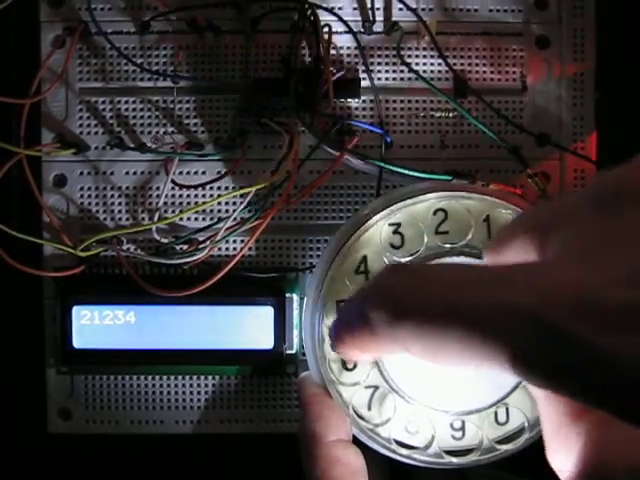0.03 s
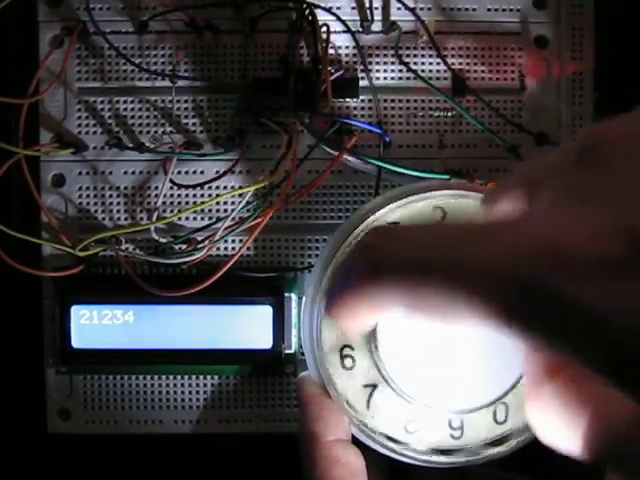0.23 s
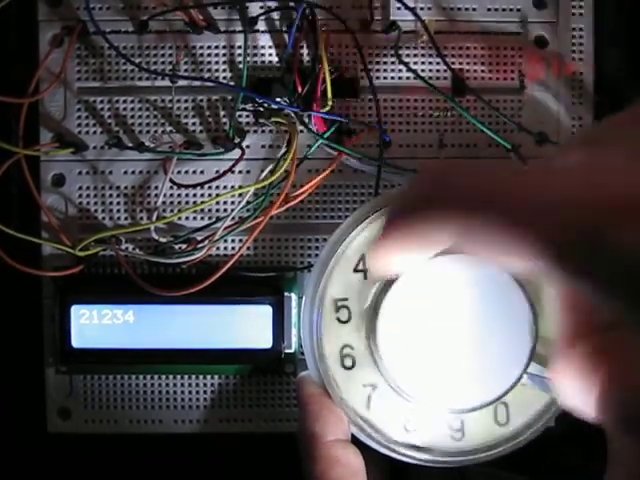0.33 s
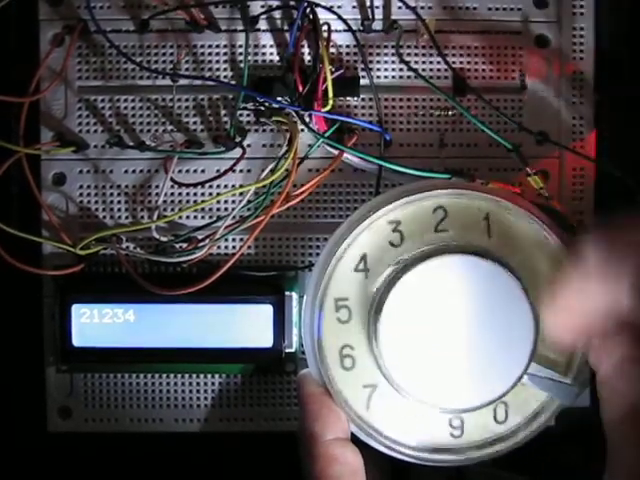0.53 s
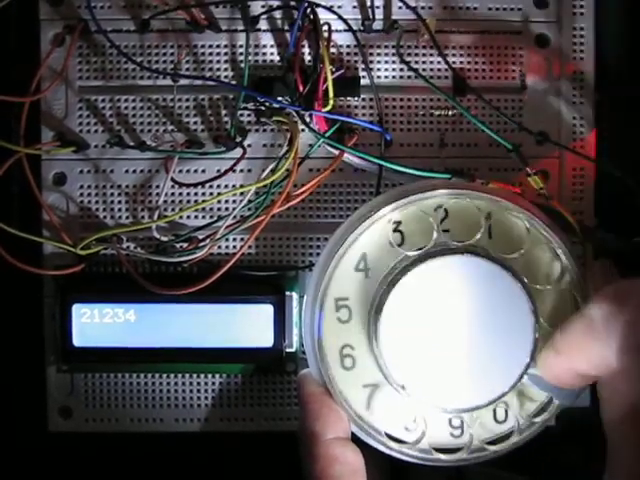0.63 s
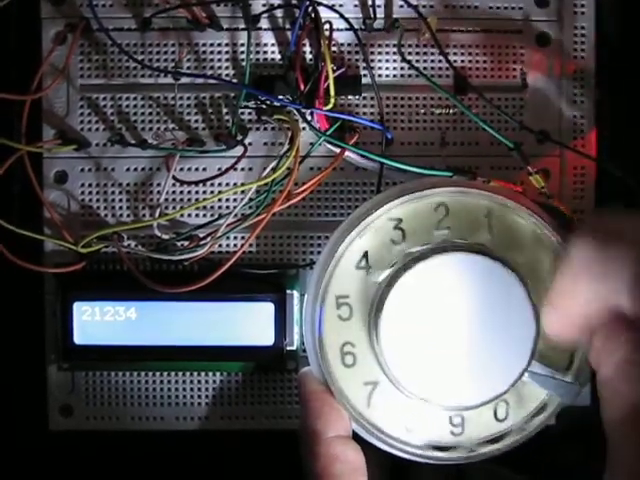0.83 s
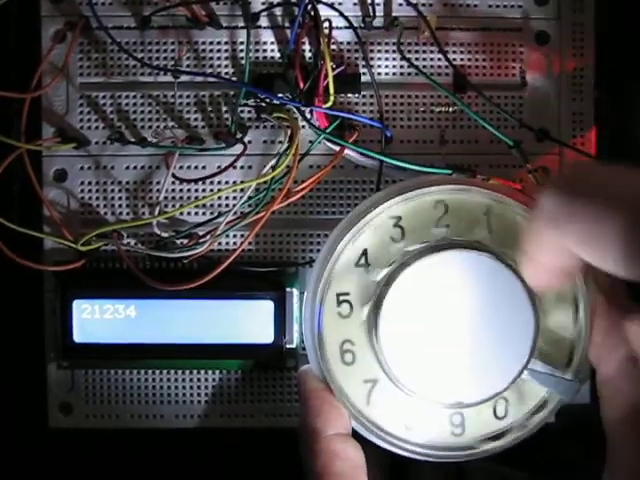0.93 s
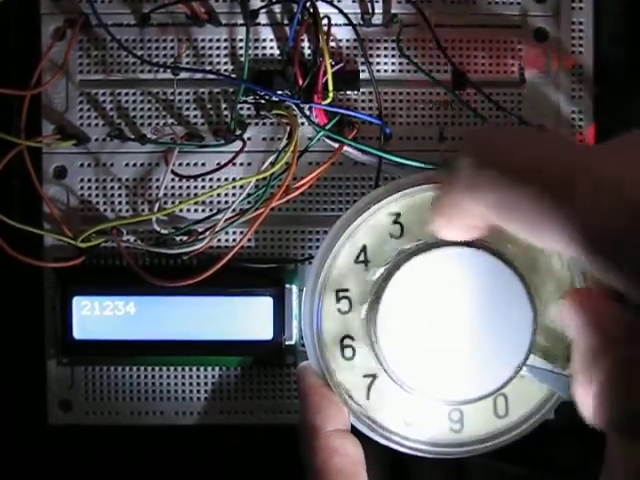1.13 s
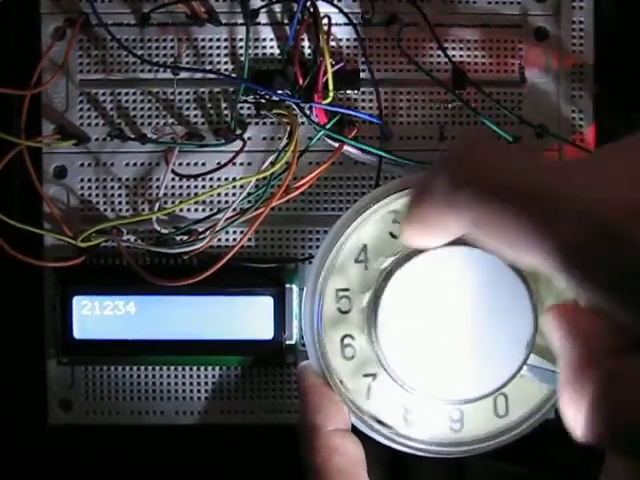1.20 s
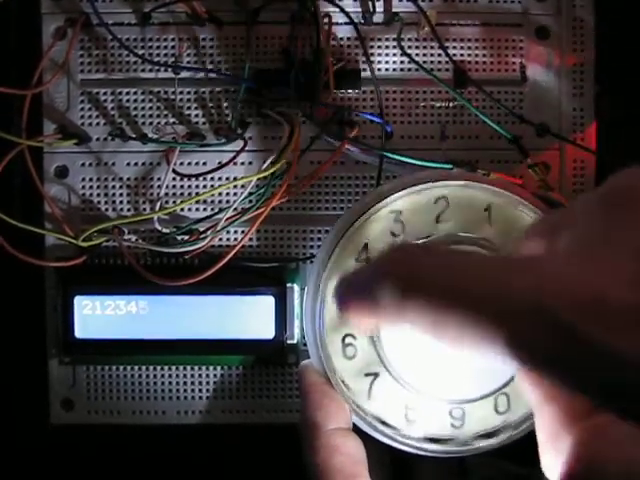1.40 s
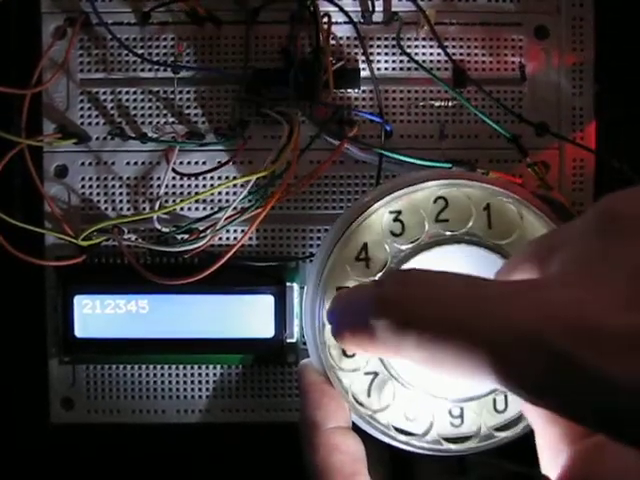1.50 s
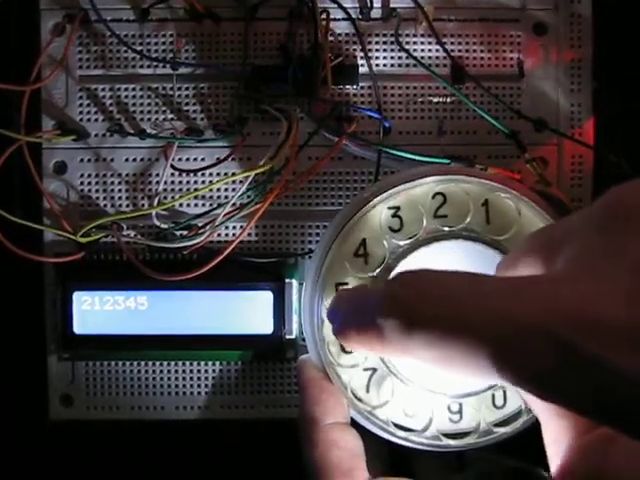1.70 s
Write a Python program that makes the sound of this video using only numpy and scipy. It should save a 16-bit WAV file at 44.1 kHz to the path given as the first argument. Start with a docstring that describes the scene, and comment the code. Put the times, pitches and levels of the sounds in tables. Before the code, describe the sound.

A rotary telephone dial is wound with ratcheting clicks, then whirs back and clatters to rest.

```python
"""A bare rotary telephone dial dials a five, close to the microphone on a desk in a small room.
The finger winds it over a ratchet to the stop and lets go; the governor whirs it home while a cam works
the pulse contacts, and it clatters to rest. The dial sits a little to the right of the microphone.
Under the run home is a faint handling rumble; behind it, room tone, a fan-like hum and a thin whine."""
import sys
import numpy as np
from scipy import signal
from scipy.fft import rfft, irfft
from scipy.io import wavfile
from scipy.ndimage import uniform_filter1d

SR = 44100
rng = np.random.default_rng(int(sys.argv[2]) if len(sys.argv) > 2 else 0)


def wav_record(signal):
    """Record a signal, one row per channel, as 16-bit PCM in the file named by sys.argv[1]."""
    frames = np.transpose(np.atleast_2d(signal))
    bounded = np.clip(frames, -1, 1)
    # unit amplitude maps onto the largest positive 16-bit level
    quanta = np.round(bounded * 32767).astype(np.int16)
    wavfile.write(sys.argv[1], SR, quanta)


N = 77175
T = np.arange(N) / SR


def dial():
    """The whole mechanism, heard close up: wound to the stop, released, and running home."""
    pawl = ratchet()
    blows = strikes() + knocks()
    ringing = metal(undb(3) * pawl + blows)
    return pawl + blows + ringing + rubbing() + governor() + contacts() + scrape_and_knock() + clatter()


# Ratchet clicks on the wind-up (time [s], then relative level [dB] in each of the five click bands)
RATCHET_CLICKS = [(0.0385, -51.5, -45, -54, -58, -64), (0.2087, -58, -33, -34.5, -31, -63),
                  (0.2364, -35, -25, -31.5, -40.5, -55), (0.2700, -62, -43, -45, -46, -74),
                  (0.2858, -70, -36, -68, -53, -68), (0.2965, -39, -29, -31.5, -36, -56),
                  (0.3001, -35.5, -28.5, -40, -43, -63), (0.3445, -51, -57, -35, -37, -49),
                  (0.3475, -49, -33, -32.5, -32.5, -57), (0.3517, -35, -26.5, -43, -38, -47),
                  (0.354, -45, -30.5, -33, -43, -41.5), (0.3672, -58, -39, -39, -71, -55),
                  (0.398, -42, -30.5, -30.5, -34.5, -87), (0.4012, -77, -25.5, -32, -46, -51),
                  (0.4378, -38, -53, -33.5, -37, -51), (0.4418, -40.5, -27.5, -32.5, -30, -70),
                  (0.4587, -60, -34, -41, -35, -72), (0.4845, -55, -28, -32.5, -27.5, -50),
                  (0.488, -41, -51.5, -31.5, -37, -62), (0.5054, -39, -39.5, -41, -33, -70),
                  (0.5238, -37, -31.5, -37, -32.5, -58), (0.5495, -40, -42, -49, -53, -71),
                  (0.5742, -73, -50, -51, -37, -59), (0.5816, -35.5, -27.5, -32, -24.5, -69),
                  (0.5838, -39, -26.5, -30.5, -38, -73)]
RATCHET_RATTLE = dict(scatter=.3, rattle_s=.0009, lag_s=.0003)

def ratchet():
    """The ratchet clicks unevenly as the finger winds the wheel."""
    return undb(-2.5) * clicks(RATCHET_CLICKS, RATCHET_RATTLE)


# Modes rung as the finger touches the stop, the wheel hits it, is released, lands, and rebounds # (frequency
# [Hz], t60 [s], level [dB])
TOUCH = [(2684, 0.014, -23.5), (3300, 0.003, -26), (4530, .008, -29), (5860, .009, -24), (7400, .008, -28)]
STOP = [(2116, 0.021, -28), (2870, 0.005, -19), (3110, 0.0063, -6), (4430, 0.012, -20.5),
        (6230, 0.011, -24.5), (7590, 0.0026, -9.5), (8640, 0.007, -19.5), (12430, 0.012, -29)]
RELEASE = [(1810, 0.025, -28.5), (2740, 0.016, -18.5), (3960, 0.0048, -14.5), (4940, 0.0079, -11.5),
           (7500, 0.0072, -23)]
LANDING = [(2130, 0.0066, -17.5), (2800, 0.0042, -19), (3045, 0.0074, -7.5), (5200, .002, -22),
           (7700, 0.0035, -17)]
REBOUND = [(2000, .008, -26), (2740, .025, -19), (3025, 0.0099, -15.5), (4330, 0.006, -29),
           (6800, 0.0054, -22.5), (7850, 0.0082, -16.5), (12700, 0.011, -36)]
# The main blows (time [s], crack gain [dB], modes)
STRIKES = [(0.6996, -40, TOUCH), (0.7217, -15.5, STOP), (0.8213, -32.5, RELEASE), (1.4481, -24, LANDING),
           (1.4904, -24, REBOUND)]
# Spectrum of the crack (frequency [Hz], gain [dB])
CRACK_COLOUR = [(500, -22), (1500, -30), (8000, 10), (11000, -7.5), (16000, -16)]

def strikes():
    """Each main blow cracks and rings the modes of the part that it hits."""
    out, t = np.zeros((2, N)), T[:SR // 50]
    for start, crack_db, modes in STRIKES:
        burst = stereo_noise(len(t), spread=.99) * np.exp(-t / .0009)
        add(out, start, undb(crack_db) * colour(burst, CRACK_COLOUR))
        for hz, t60, db in modes:
            add(out, start, ping(hz, t60, rise_s=.00035, db=db))
    return out


# Lesser knocks (time [s], then relative level [dB] in each of the five click bands)
KNOCKS = [(0.7192, -28.5, -31, -30, -33, -54), (0.8238, -49, -34, -26.5, -38, -47),
          (1.4268, -44, -26, -75, -31, -50), (1.4305, -37, -31.5, -33, -34, -45),
          (1.437, -48, -19.5, -29, -36, -54), (1.4393, -37, -23, -32, -26.5, -67),
          (1.445, -53, -31, -39.5, -34, -53), (1.4508, -30, -49, -28, -42, -48),
          (1.4705, -52, -37, -44, -34, -77), (1.4748, -61, -30, -41, -43, -71),
          (1.557, -53, -41, -46, -74, -73), (1.5651, -42, -29, -34.5, -44.5, -60)]

def knocks():
    """Lighter knocks on the frame surround the main blows."""
    return undb(-2.5) * clicks(KNOCKS, dict(scatter=.15, rattle_s=.0009, lag_s=0))


# Governor speed on the run home (time [s], speed [turns/s])
GOVERNOR_SPEED = [(.82, 44.5), (.95, 44), (1.05, 40.5), (1.2, 42.5), (1.42, 40.5)]
# The four taps of the weights in each turn (relative level [dB])
TAPS_DB = [2, -2, -1.5, -5.5]
# Loudness of the whir (time [s], level [dB])
WHIR_LEVEL = [(.822, -64), (.832, -40.5), (1., -40), (1.1, -42), (1.2, -42), (1.27, -40), (1.35, -42),
              (1.46, -46), (1.52, -53.5)]
# Spectrum of the whir in the frame (frequency [Hz], relative level [dB])
WHIR_COLOUR = [(410, -37.5), (700, -16.5), (747, -11), (807, -34), (1120, -22.5), (1430, -8), (1670, -15.5),
               (2110, -6), (2530, -7.5), (2800, 1), (3360, -10), (4700, -10), (6420, -23), (7600, -16),
               (15500, -59.5)]
# A resonance that rises and sinks as the wheel turns (time [s], frequency [Hz], level [dB])
GLIDE = [(.83, 2660, -50), (.95, 3180, -74), (1., 3370, -37.5), (1.06, 3900, -55.5), (1.14, 4600, -49.5),
         (1.23, 4050, -48), (1.28, 3160, -44), (1.41, 2700, -39)]
TAP_DECAY_S, TAP_SCATTER_DB, TEETH_PER_TAP = .0019, 1.6, 5
CUP_SLIDE_DB, FRAME_SLIDE = -10.5, .26  # steady rubbing between the taps

def governor():
    """Driven tooth by tooth, the weights tap and slide in their cup and set the frame whirring."""
    taps_per_s = len(TAPS_DB) * curve(GOVERNOR_SPEED)
    phase = np.cumsum(taps_per_s) / SR + .05 * walk(90)
    tap = np.floor(phase).astype(int)
    tap_db = np.array(TAPS_DB)[tap % len(TAPS_DB)] + TAP_SCATTER_DB * rng.standard_normal(N)[tap]
    since_tap = (phase % 1) / taps_per_s
    contact = undb(tap_db) * np.exp(-since_tap / TAP_DECAY_S) + undb(CUP_SLIDE_DB)
    teeth = unit(np.exp(-(TEETH_PER_TAP * phase % 1) / .55))
    glide_s, glide_hz, glide_db = np.array(GLIDE).T
    glide_drive = stereo_noise(N, spread=.2) * contact ** 1.16 * teeth
    glide = resonate(glide_drive, np.interp(T, glide_s, glide_hz), width_hz=620)
    glide *= undb(np.interp(T, glide_s, glide_db))
    frame_drive = stereo_noise(N, spread=.24) * (contact + FRAME_SLIDE) * teeth
    whir = unit(colour(frame_drive, WHIR_COLOUR)) * envelope(WHIR_LEVEL)
    return whir + glide * run_home()


def run_home():
    """1 while the dial runs home, with soft edges."""
    return uniform_filter1d(during(GOVERNOR_SPEED), size=900)


# Pulse contacts, opening then closing
# (first time [s], frequency [Hz], t60 [s], rise [s], ring level [dB], relative tick level [dB])
CONTACTS = [(.8450, 2380, .03, .004, -34, -46), (.8775, 2150, .02, .002, -31, -43)]
PULSE_PERIOD_S, CAM_END_S = .0958, 1.34

def contacts():
    """A cam opens and closes the leaf springs once per pulse; each ticks and rings briefly."""
    out = np.zeros((2, N))
    tick_bands_db = np.array([-2.5, -3, -1, -7.5, -10.5])
    for first, hz, t60, rise_s, ring_db, tick_db in CONTACTS:
        for start in np.arange(first, CAM_END_S, PULSE_PERIOD_S):
            detune = 1 + .0114 * rng.standard_normal()
            add(out, start, ping(hz * detune, t60, rise_s, ring_db))
            add(out, start, click(tick_db + tick_bands_db, **RATCHET_RATTLE))
    return out


# Gears rubbing under the finger (time [s], level [dB])
RUB_LEVEL = [(.2, -54), (.26, -51), (.3, -37), (.325, -48), (.36, -43.5), (.43, -41), (.51, -38.5),
             (.545, -42), (.6, -60), (.68, -68), (.73, -51), (.78, -54.5), (.815, -48.5)]
# Spectrum of the rubbing (frequency [Hz], relative level [dB])
RUB_COLOUR = [(530, -41), (900, -27), (1600, -20), (2630, 1), (3250, -6), (4310, -13), (5780, -8),
              (6350, -15.5), (7490, -14.5), (9370, -34), (15000, -46)]
TEETH_PER_S, CATCH_S, GEAR_SLIDE = 130, .0022, .43

def rubbing():
    """Gear teeth catch and slip in small uneven steps under the finger."""
    phase = T * TEETH_PER_S + .23 * walk(60)
    grip = np.exp(-(phase % 1) / TEETH_PER_S / CATCH_S) + GEAR_SLIDE
    return unit(colour(stereo_noise(N, spread=.2) * grip, RUB_COLOUR)) * envelope(RUB_LEVEL)


# Shaking of the loose parts (time [s], level [dB])
CLATTER_LEVEL = [(1.422, -33.5), (1.428, -43.5), (1.44, -30.5), (1.452, -35), (1.466, -46)]

def clatter():
    """Loose parts rattle densely against the frame as the wheel lands."""
    shaking = stereo_noise(N, spread=.25) * np.exp(.5 * walk(360))
    spectrum = [(500, -52), (1500, -4), (2900, .5), (4500, -6), (7500, -12.5), (10500, -39), (15000, -34)]
    return unit(colour(shaking, spectrum)) * envelope(CLATTER_LEVEL)


# A brief scrape near 2.1 kHz while the wheel is held at the stop, and a hollow knock on landing (time [s],
# frequency [Hz], t60 [s], rise [s], level [dB])
SCRAPE_AND_KNOCK = [(.774, 2120, 0.02, 0.0026, -39.5), (1.438, 986, 0.047, 0.00042, -33)]

def scrape_and_knock():
    """A short tonal scrape while the wheel is held at the stop, and a hollow knock as it lands."""
    out = np.zeros((2, N))
    for start, *mode in SCRAPE_AND_KNOCK:
        add(out, start, ping(*mode))
    return out


# Long faint rings of the metal parts (frequency [Hz], t60 [s], relative level [dB])
METAL_MODES = [(2645, 0.054, 1), (2780, 0.1, -12), (7180, 0.08, -8), (7700, 0.0512, -3), (12300, .09, -1)]

def metal(blows):
    """Springs and gear wheels ring on after a blow."""
    t = T[:SR // 5]
    ring = sum(undb(db) * np.sin(2 * np.pi * hz * t) * decay(t, t60) for hz, t60, db in METAL_MODES)
    return undb(-36) * signal.fftconvolve(blows, ring[None] / np.linalg.norm(ring))[:, :N]


# Resonances of the frame and finger wheel (frequency [Hz], width [Hz], relative level [dB])
BODY_MODES = [(1238, 410, -22.5), (2020, 434, -8), (2664, 505, 4), (3184, 1120, -6.5), (3660, 370, -1),
              (4694, 2830, -9), (5980, 730, -4.5), (6630, 2700, -12), (7960, 1100, -5), (8960, 530, -7),
              (10670, 1500, -26), (12300, 830, -26), (14370, 1600, -43)]
# The five click bands (centre [Hz])
CLICK_BANDS_HZ = [1390, 3130, 4300, 7030, 11500]

def click(band_db, scatter, rattle_s, lag_s, size=4096):
    """A blow with a brief rattle rings the body; where it lands sets the strength of each band."""
    t, hz = np.arange(size) / SR, np.fft.rfftfreq(size, 1 / SR) + 1
    push = scatter * stereo_noise(size, spread=.27) * np.exp(-t / rattle_s)
    push[:, 0] += 1  # the blow itself
    body = sum((-1) ** k * undb(db) / (1 + 1j * centre / width * (hz / centre - centre / hz)) ** 2
               for k, (centre, width, db) in enumerate(BODY_MODES))
    delay = lag_s * np.maximum(np.log2(CLICK_BANDS_HZ[-2] / hz), 0)  # lows trail by lag_s per octave
    spectrum = rfft(push) * body * np.exp(-2j * np.pi * np.cumsum(delay) * SR / size)
    edges_hz = [800, 2200, 3600, 5600, 9000, 16000]
    bands = [(hz > low) & (hz < high) for low, high in zip(edges_hz, edges_hz[1:])]
    for _ in range(2):  # bring each band to its level, with the energy taken as spread over 4 ms
        power = np.mean(abs(spectrum) ** 2, axis=0) * 2 / size / (.004 * SR)
        now_db = 10 * np.log10([power[band].sum() for band in bands])
        spectrum *= gains(list(zip(CLICK_BANDS_HZ, band_db - now_db)), hz)
    return irfft(spectrum)[:, :size // 2]


def clicks(table, rattle):
    """A run of blows on the body, one click per row."""
    out = np.zeros((2, N))
    for start, *band_db in table:
        add(out, start, click(band_db, **rattle))
    return out


def handling():
    """A low handling rumble near 86 Hz while the dial runs home."""
    return undb(-67.5) * resonate(rng.standard_normal(N), hz=86, width_hz=17) * run_home()


# The dial at the microphone, left minus right (frequency [Hz], level [dB])
BALANCE_DB = [(1200, -1.5), (2000, -1), (2700, -6.5), (3500, -6), (5000, 0), (7500, -2.5), (11000, -1)]
# Lead of the left channel (frequency [Hz], phase [rad])
LEFT_LEAD = [(1000, -0.085), (2400, 0.27), (4200, -0.47), (5800, -0.92), (9500, -0.83), (12000, -1.4)]

def microphone(sound):
    """The close stereo microphone hears the dial a little to the right, by level and by phase."""
    hz = np.fft.rfftfreq(N, 1 / SR)
    lead = np.interp(hz, *np.array(LEFT_LEAD).T)
    left = np.sqrt(gains(BALANCE_DB, hz)) * np.exp(.5j * lead)
    return irfft(rfft(sound) * np.array([left, 1 / left]), N)


def reflections(sound, t60, db, delay_s):
    """Nearby surfaces send a diffuse tail to the microphone after a short delay."""
    t = T[:SR // 2]
    tail = stereo_noise(len(t), spread=.67) * decay(t, t60) * (t > delay_s)
    return undb(db) * signal.fftconvolve(sound, unit(tail) / np.sqrt(len(t)), axes=1)[:, :N]


# Spectrum of the room tone (frequency [Hz], relative level [dB])
ROOM_COLOUR = [(25, -25.5), (76, -19), (170, -7.5), (280, -3.5), (400, -15), (760, -16), (1200, -20),
               (2500, -27), (5000, -31.5), (7800, -36), (8300, -27.5), (9100, -38.5), (16000, -45)]
# Its loudness (time [s], level [dB])
ROOM_LEVEL = [(0, -51.5), (.9, -51.5), (1.75, -52.5)]
# Its width, side against mid (frequency [Hz], level [dB])
ROOM_SIDE = [(50, -6), (150, -24), (500, -7.5), (2000, -3), (10000, 3)]
LEFT_RIGHT = np.array([[1], [-1]])

def room_tone():
    """Low, fan-like noise around the microphone, widest in the treble."""
    mid, side = rng.standard_normal((2, N))
    air = mid + colour(side, ROOM_SIDE) * LEFT_RIGHT
    return unit(colour(air, ROOM_COLOUR)) * undb(curve(ROOM_LEVEL))


# Tones of the electronics (frequency [Hz], level [dB], waver depth [ratio])
HUM_TONES = [(192.1, -55.5, 0.49), (270.7, -62.5, 1), (567.5, -67.5, 0.52), (762, -62, 0.093)]

def hum():
    """Electronics hum in the background, each tone wavering a little."""
    out = 0
    for hz, db, depth in HUM_TONES:
        waver = 1 + depth * (walk(10.3) + 1j * walk(14)) / np.sqrt(2)
        out += undb(db) * unit(np.real(waver * np.exp(2j * np.pi * hz * T)))
    return out


WHINE_HZ, UPPER_WHINE_HZ, SKIPS_PER_S, WHINE_PAN_DB = 8265, 10100, 29.7, -10

def whine():
    """Off to the right, a thin electronic tone whose phase keeps skipping, with a faint higher one."""
    skips = uniform_filter1d(np.floor(T * SKIPS_PER_S), size=150)
    tone = undb(-64) * unit(np.sin(2 * np.pi * WHINE_HZ * T + np.pi * skips))
    upper = undb(-81.5) * unit(np.sin(2 * np.pi * UPPER_WHINE_HZ * T))
    return (tone + upper) * undb(WHINE_PAN_DB / 2 * LEFT_RIGHT)


def ping(hz, t60, rise_s, db):
    """One mode that swells and dies away."""
    t = T[:SR // 10]
    shape = (1 - np.exp(-t / rise_s)) ** 2 * decay(t, t60)
    return undb(db) * shape / shape.max() * np.sin(2 * np.pi * hz * t)


def resonate(x, hz, width_hz):
    """Two-stage resonance whose centre may move; rms 1."""
    turn = np.exp(2j * np.pi * np.cumsum(hz * np.ones(N)) / SR)
    pole = np.exp(-np.pi * width_hz / SR)
    return unit(np.real(signal.lfilter([1], np.poly([pole, pole]), x / turn) * turn))


def decay(t, t60):
    """Fall by 60 dB in t60 seconds."""
    return np.exp(-np.log(1000) * t / t60)


def undb(db):
    """Decibels to gain."""
    return 10 ** (np.asarray(db) / 20)


def unit(x):
    """Scale to rms 1."""
    return x / np.sqrt(np.mean(x ** 2) + 1e-20)


def curve(rows):
    """Join (time [s], value) points by straight lines."""
    return np.interp(T, *np.array(rows).T)


def during(rows):
    """1 between the times of the first and last row, else 0."""
    return 1. * (T > rows[0][0]) * (T < rows[-1][0])


def envelope(rows):
    """Gain along (time [s], level [dB]) points, silent outside them."""
    return undb(curve(rows)) * during(rows)


def gains(points, hz):
    """Gain of (frequency [Hz], level [dB]) points on a log-frequency axis."""
    point_hz, db = np.array(points).T
    return undb(np.interp(np.log(hz + 1), np.log(point_hz), db))


def colour(x, points):
    """Filter by (frequency [Hz], level [dB]) points."""
    size = x.shape[-1]
    return irfft(rfft(x, 2 * size) * gains(points, np.fft.rfftfreq(2 * size, 1 / SR)))[..., :size]


def stereo_noise(size, spread):
    """Noise for two channels, partly shared."""
    mid, side = rng.standard_normal((2, size))
    return (mid + spread * side * LEFT_RIGHT) / np.hypot(1, spread)


def walk(rate_hz):
    """Smooth random motion; rms 1."""
    lowpass = np.exp(-(np.fft.rfftfreq(N, 1 / SR) / rate_hz) ** 2)
    return unit(irfft(rfft(rng.standard_normal(N)) * lowpass, N))


def add(out, start, sound):
    """Mix a sound in at a time."""
    i = max(int(start * SR), 0)
    out[:, i:i + sound.shape[-1]] += sound[..., :N - i]


def scene():
    """The dial on a desk, close to the microphone, with the small room behind it."""
    direct = dial() + handling()
    desk = reflections(direct, t60=.014, db=-7.5, delay_s=.0012)
    walls = reflections(direct, t60=.207, db=-20.5, delay_s=.0014)
    return microphone(direct + desk + walls) + room_tone() + hum() + whine()


def record(dry):
    """The recorder clips at full scale and cuts the top above 16 kHz."""
    lowpass = signal.ellip(10, .1, 80, 16000, fs=SR, output="sos")
    return signal.sosfilt(lowpass, np.clip(dry, -1, 1))


dry = scene()
out = record(dry)
wav_record(out)
```